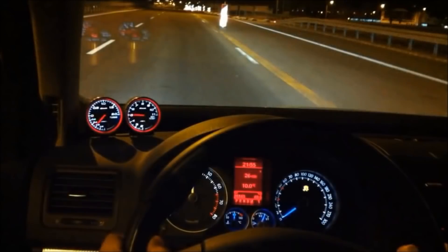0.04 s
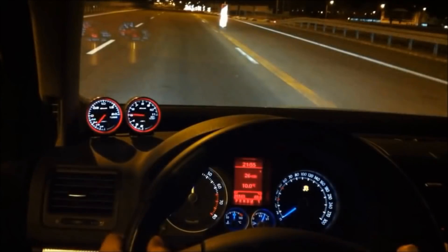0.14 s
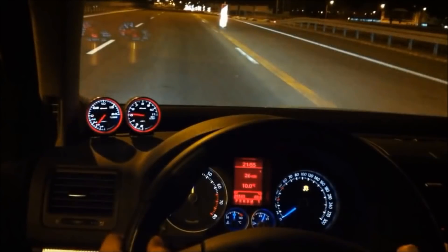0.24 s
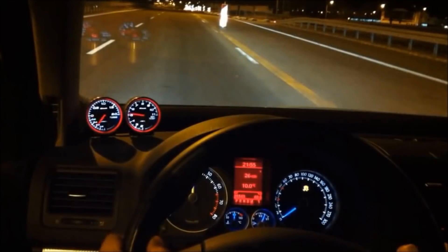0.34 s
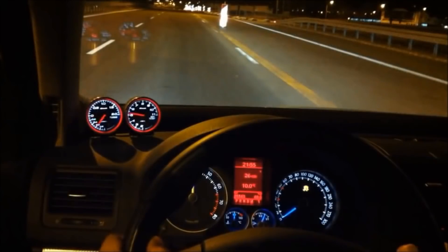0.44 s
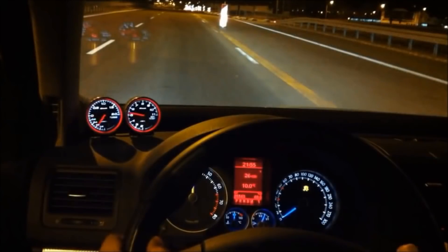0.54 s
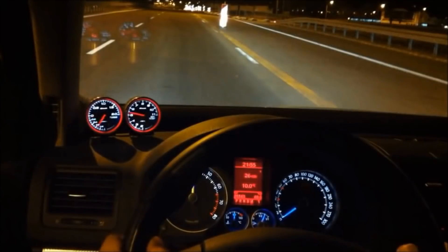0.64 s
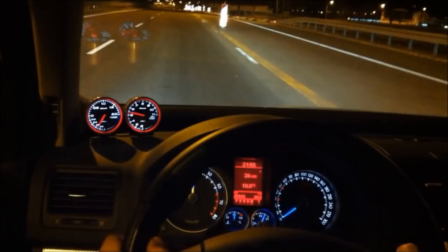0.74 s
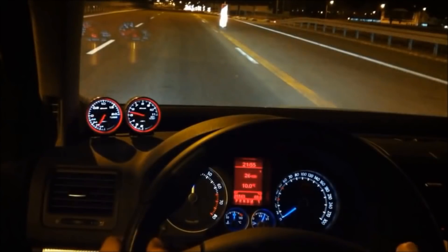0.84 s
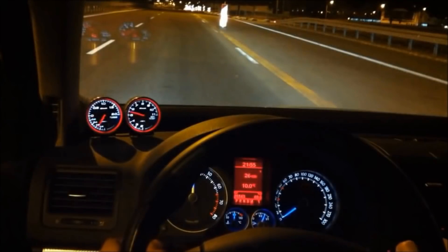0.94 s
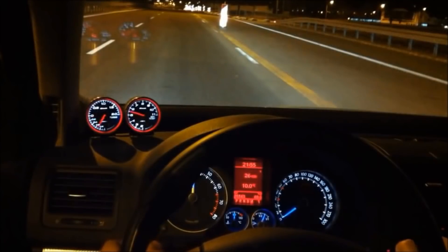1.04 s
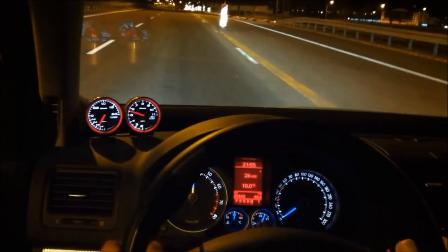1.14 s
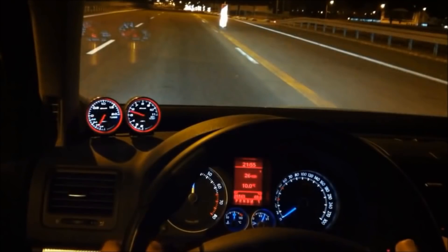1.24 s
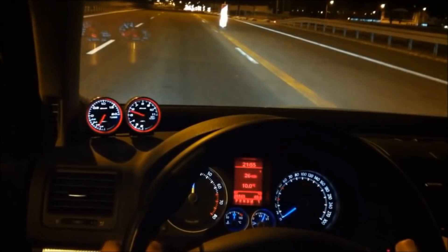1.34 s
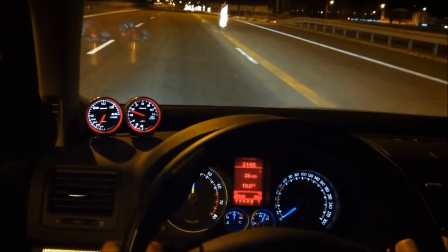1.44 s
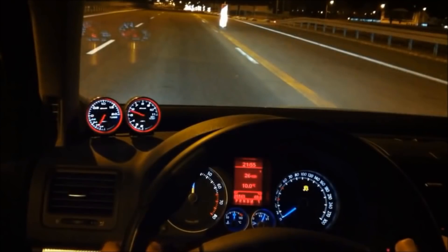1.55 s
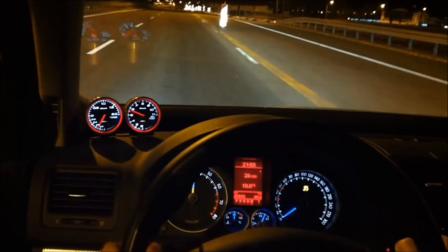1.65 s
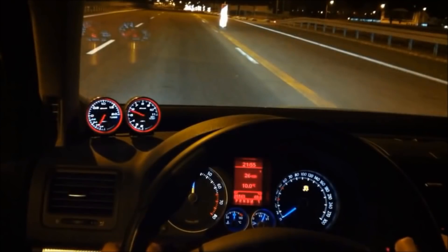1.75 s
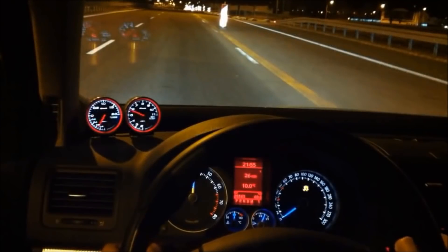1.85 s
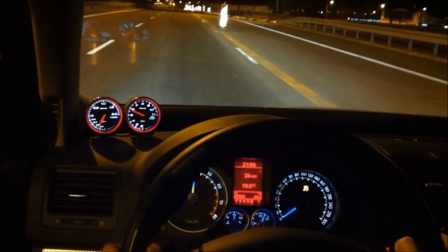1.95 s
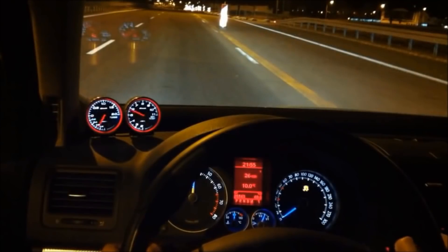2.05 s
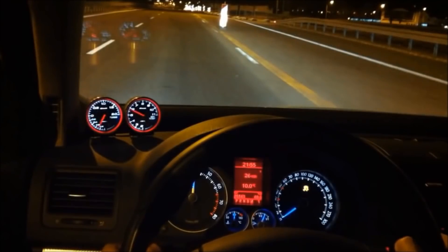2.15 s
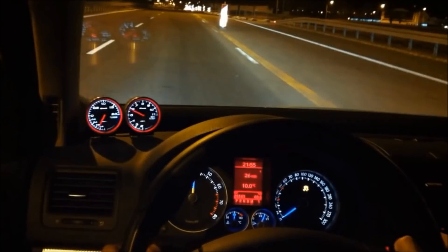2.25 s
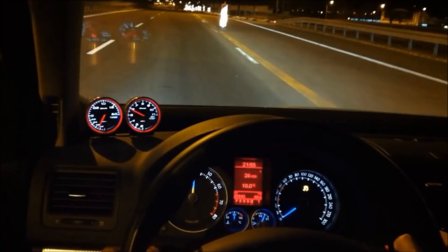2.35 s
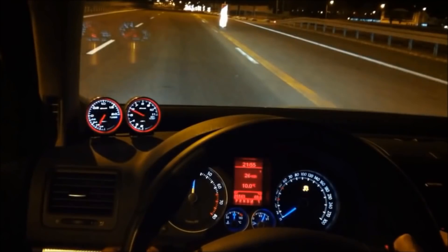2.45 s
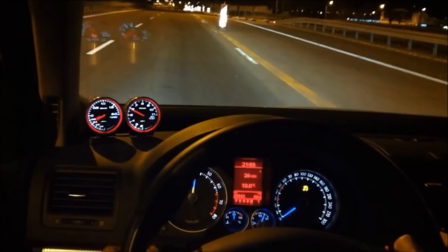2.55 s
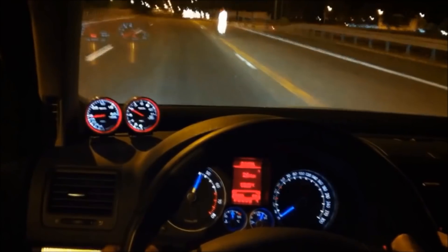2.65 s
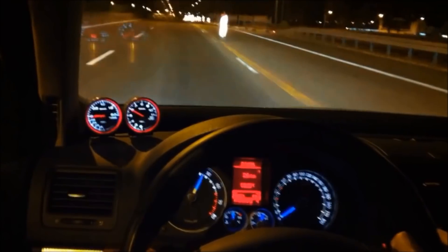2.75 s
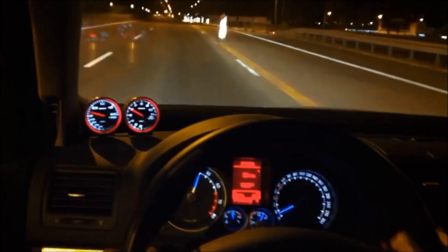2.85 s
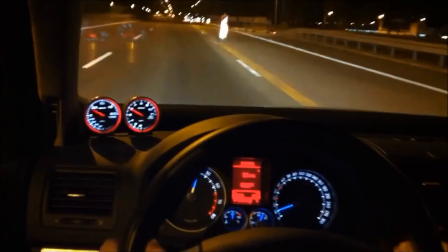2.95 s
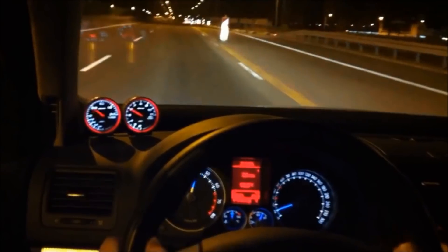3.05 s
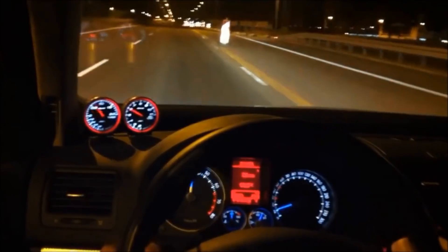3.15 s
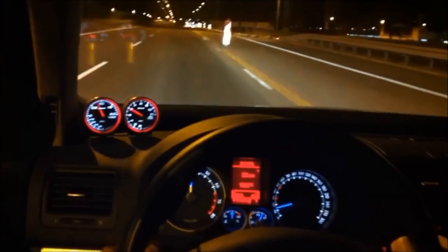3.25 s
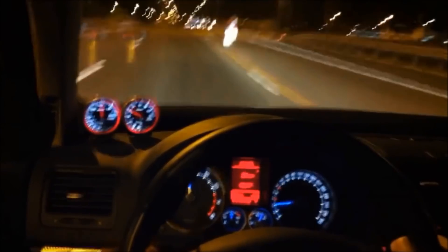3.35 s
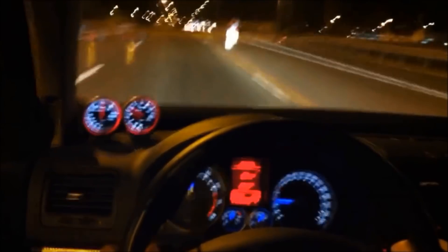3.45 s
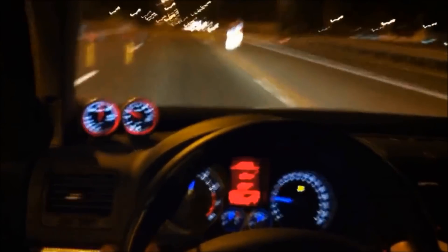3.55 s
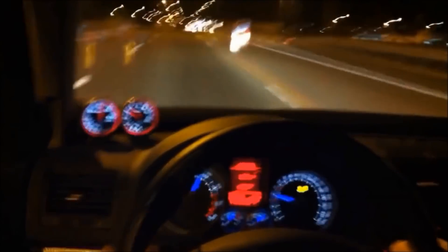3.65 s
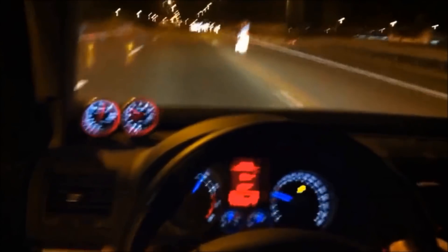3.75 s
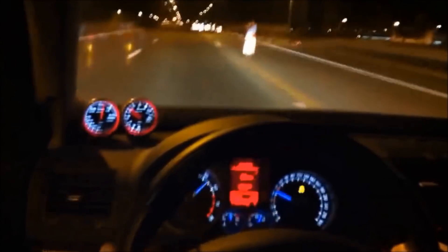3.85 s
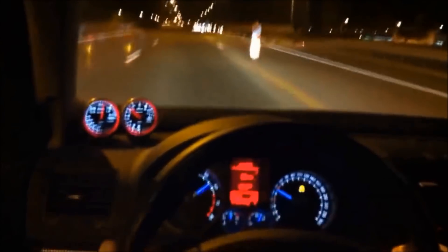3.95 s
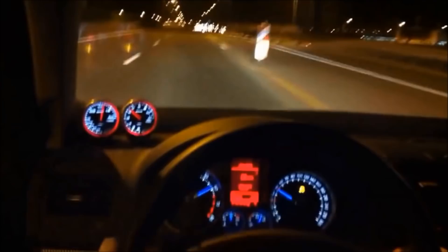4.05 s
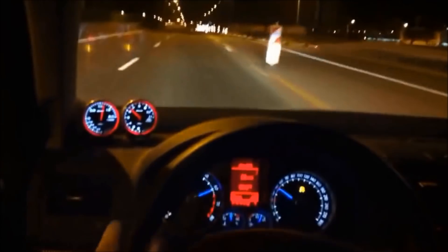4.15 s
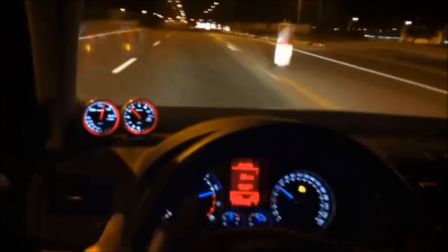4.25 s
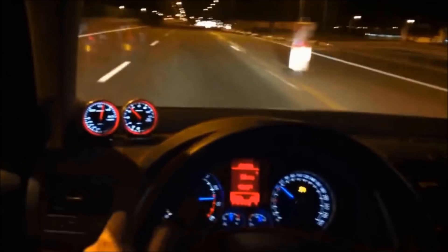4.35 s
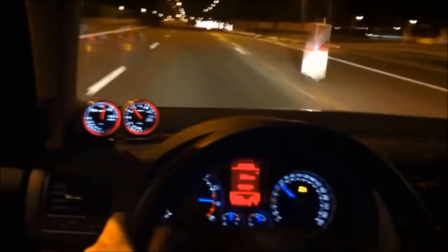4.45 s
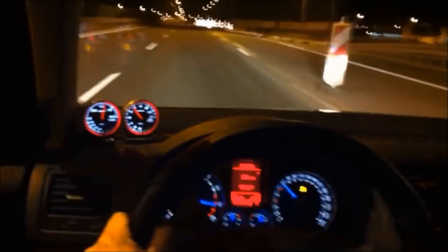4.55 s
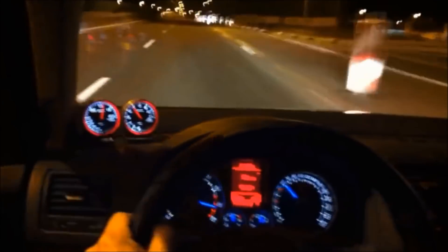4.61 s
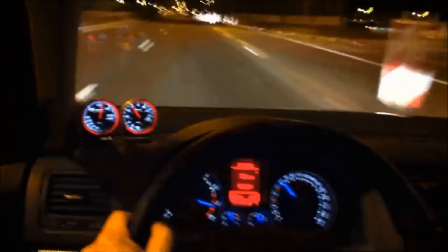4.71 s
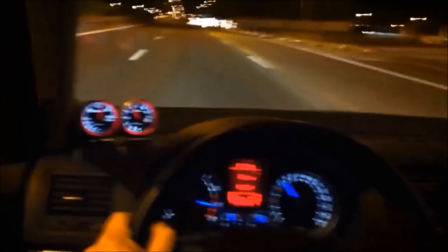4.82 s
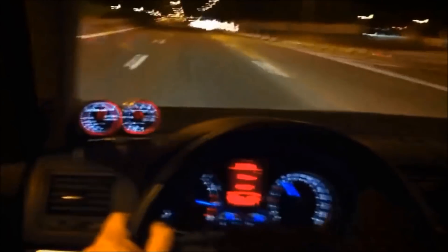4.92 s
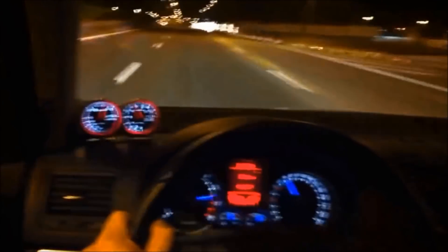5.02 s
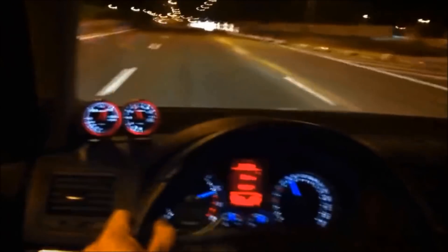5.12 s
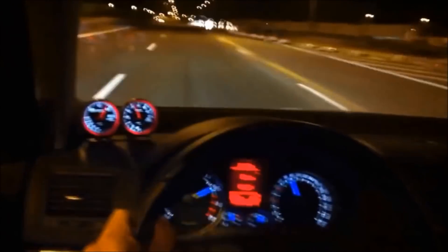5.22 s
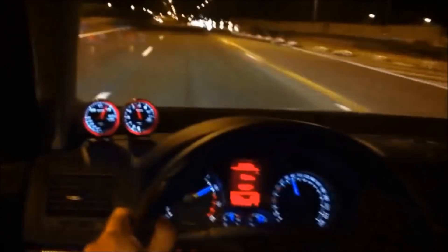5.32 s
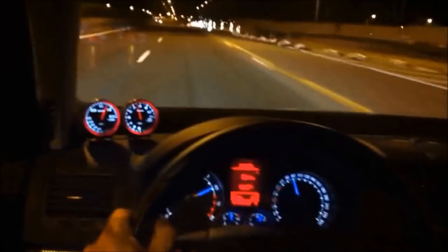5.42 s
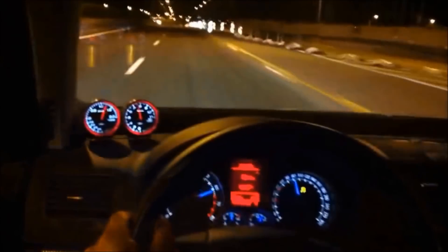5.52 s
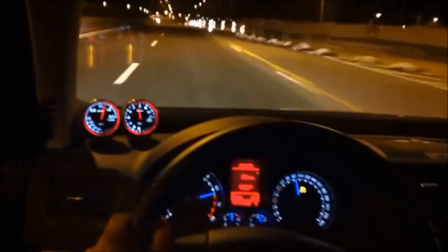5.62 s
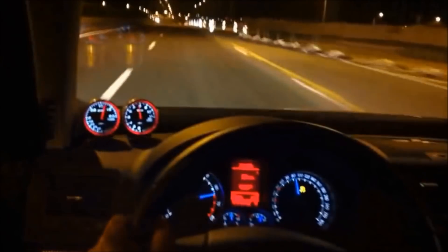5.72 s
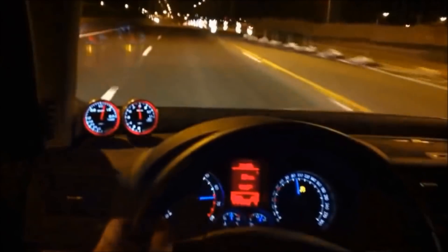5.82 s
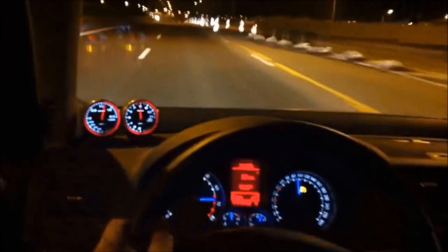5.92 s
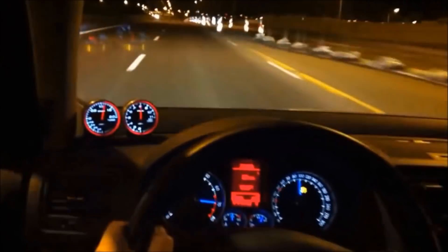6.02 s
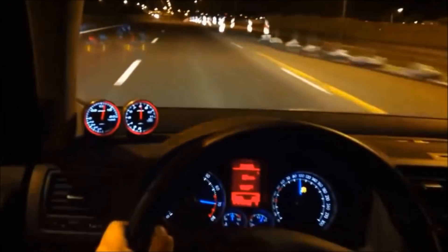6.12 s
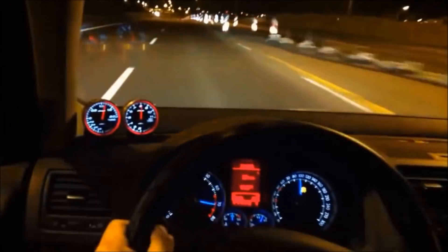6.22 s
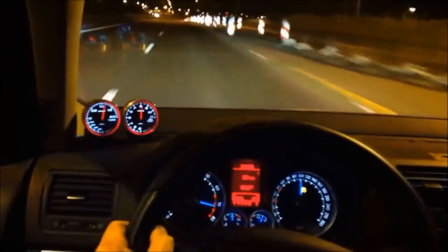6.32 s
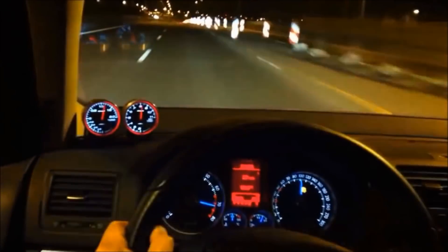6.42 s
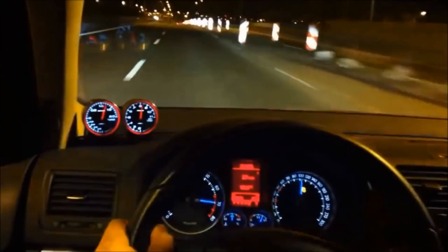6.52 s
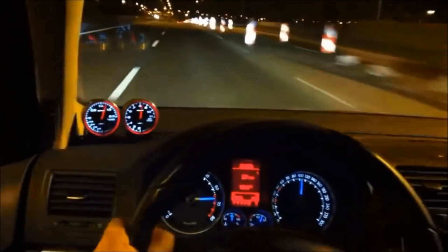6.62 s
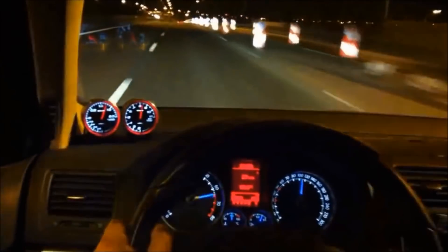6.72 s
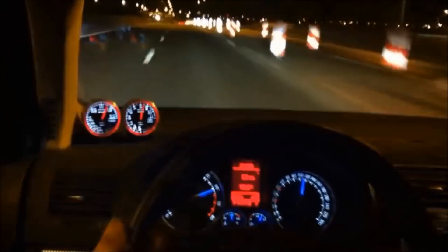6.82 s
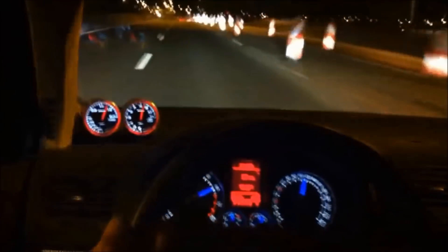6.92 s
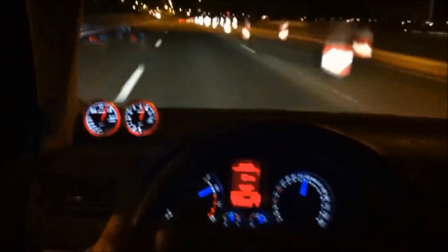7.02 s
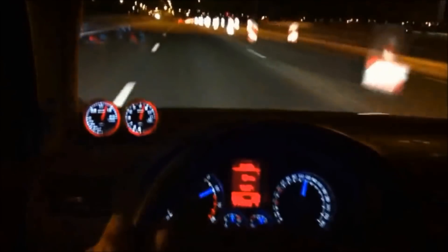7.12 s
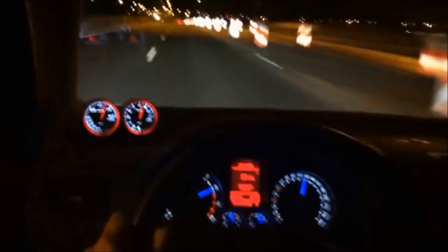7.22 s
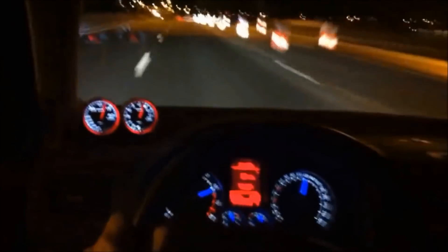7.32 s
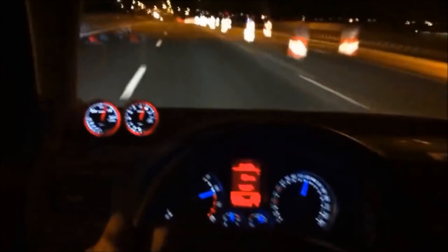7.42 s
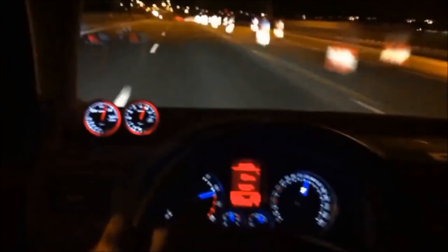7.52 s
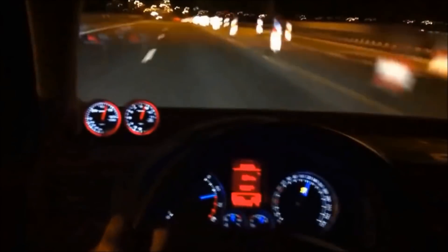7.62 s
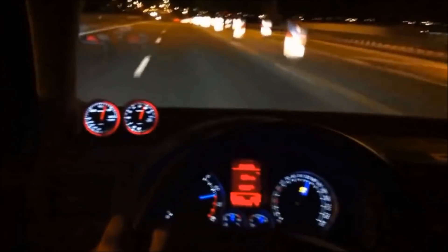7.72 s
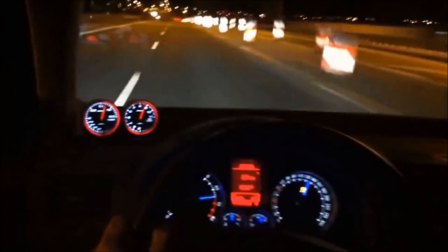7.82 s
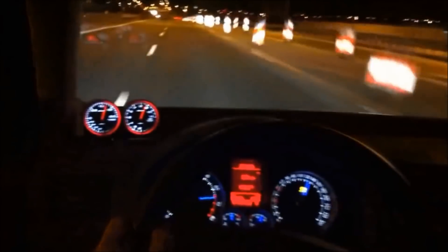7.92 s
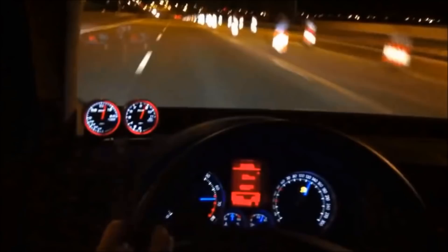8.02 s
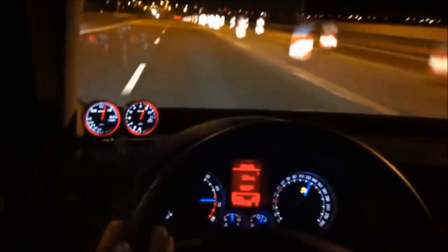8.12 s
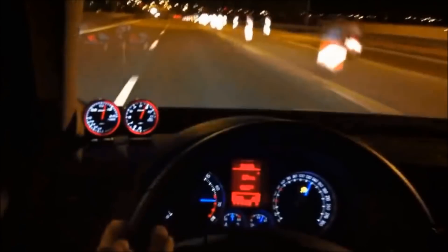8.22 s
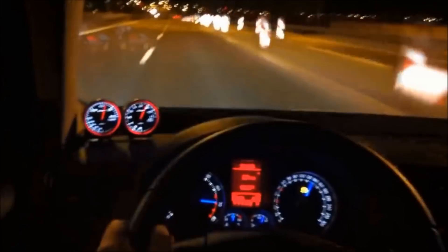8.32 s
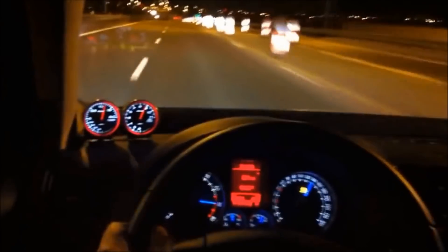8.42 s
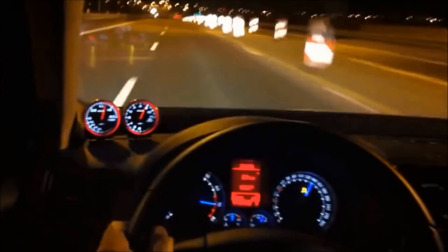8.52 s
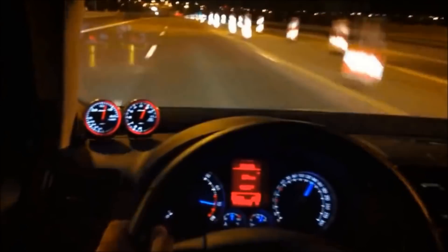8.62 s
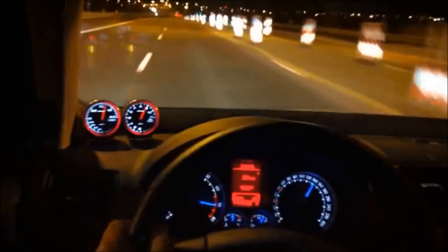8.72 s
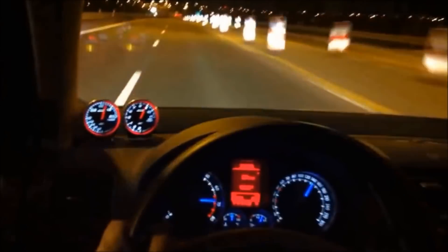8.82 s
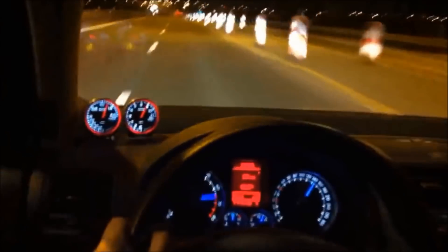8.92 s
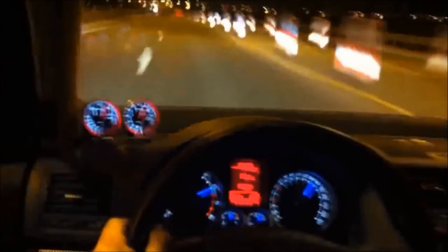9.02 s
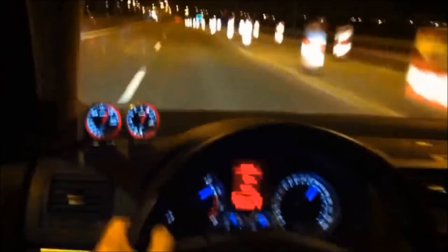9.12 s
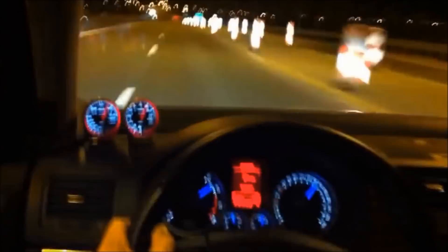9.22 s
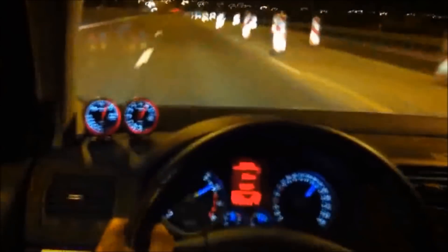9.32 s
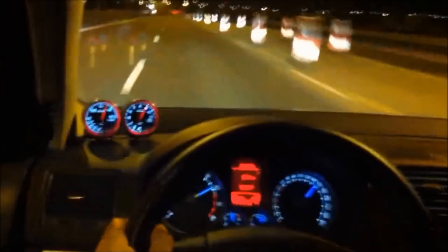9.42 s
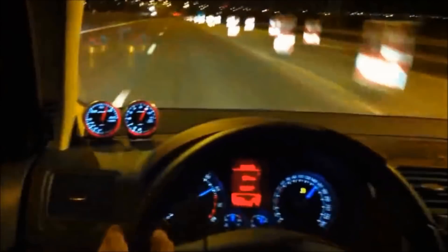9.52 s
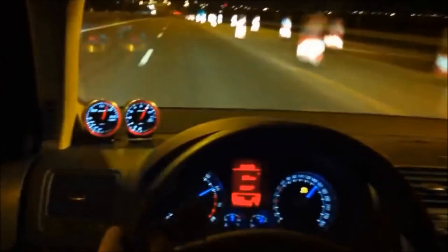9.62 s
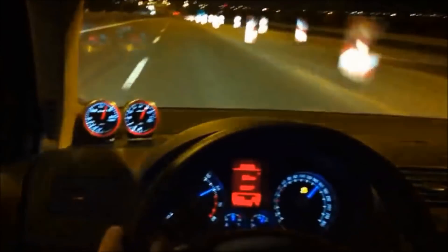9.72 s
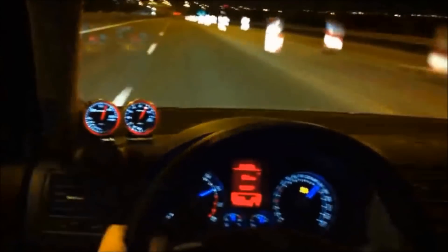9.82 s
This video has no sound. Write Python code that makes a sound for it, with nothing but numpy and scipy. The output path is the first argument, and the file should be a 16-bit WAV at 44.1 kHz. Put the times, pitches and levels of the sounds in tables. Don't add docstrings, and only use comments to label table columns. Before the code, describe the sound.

Inside a closed car cabin, recorded by a small, thin-bassed microphone near the dash. From 0 to 2.7 s a six-cylinder engine holds a steady, buzzing boom around 200 Hz, barely rising, with valve-train ticking ringing the bulkhead; dull knocks and cloth movement near 2.3-2.6 s. At 2.7 s the clutch bites: the note flares, then sags until 3.5 s, with floor thumps, plastic rattling, rustling and pops around 3.5-3.7 s as the wheels hop. The engine then pulls, much louder and rougher, climbing to about 4.7 s. A jolting upshift at 4.6-5 s stutters with hard pops and a metallic clank; pitch falls by 5.3 s. It climbs again to 6.6 s, drops by 7 s, climbs to 8.9 s, then drops around 9.2 s with a thump and short air puff. Road roar grows, trim ticks, faint turbo whistle; peaks flatten, and it ends still pulling.

```python
import sys
import numpy as np
from scipy import signal
from scipy.fft import rfft, irfft, next_fast_len
from scipy.io import wavfile
from scipy.ndimage import uniform_filter1d, minimum_filter1d

SR = 44100
rng = np.random.default_rng(int(sys.argv[2]) if len(sys.argv) > 2 else 0)


def makeup_ratio(level_db):
    decades = np.asarray(level_db, float) / 20
    return 10 ** decades


def generate_wav(signal):
    frames = np.transpose(np.atleast_2d(signal))
    scaled = np.clip(frames, -1, 1) * 32767
    pcm = np.round(scaled).astype(np.int16)
    wavfile.write(sys.argv[1], SR, pcm)


N = 434826
LAUNCH_S = 2.7
REFERENCE_HZ = 50

# start_s, cycle_hz
ENGINE = [(0.0, 32.3), (1.0, 33.2), (2.68, 33.57), (2.81, 40.12), (3.05, 36.39), (3.5, 31.13), (4.12, 48),
          (4.34, 50.8), (4.7, 60.18), (5.08, 58.8), (5.29, 48.15), (5.46, 47.85), (6.3, 59.05),
          (6.57, 59.97), (7.03, 48.0), (8.86, 59.53), (9.21, 46.99), (9.86, 48.54)]
# centre_s, change_hz, half_length_s
SPEED_SWINGS = [(2.74, 1.53, .03), (3.74, 0.87, 0.069), (4.45, 0.83, .07), (4.68, -1.08, 0.068),
                (5.8, 0.57, .15), (6.35, -0.79, .06), (6.56, -0.84, .06), (7.3, -.35, .15), (8.82, -0.74, .07),
                (9.32, -0.63, 0.073), (9.55, 0.48, 0.068)]
FLYWHEEL_S = .08


def speed():
    return uniform_filter1d(in_time(ENGINE)[0], int(FLYWHEEL_S * SR) + 1) + swells(SPEED_SWINGS)


BITE_S, BITE_HALF_S, BITE_DB = 2.71, 0.23, 5.5


def bite_db():
    return BITE_DB * np.exp(-((np.arange(N) / SR - BITE_S) / BITE_HALF_S) ** 2)


# multiple_of_cycle_rate, level_db
HELD_ORDERS = [(2, -55.5), (3, -49), (4, -36.5), (5, -49.5), (6, -27), (7, -35.5), (8, -41.5), (9, -38.5),
               (10, -44.5), (11, -31.5), (12, -44), (13, -50.5), (14, -43), (15, -50), (16, -51),
               (17, -62.5), (18, -53.5), (19, -50.5), (20, -55.5), (21, -63), (22, -57.5), (23, -59.5),
               (24, -52.5), (25, -67), (26, -60.5), (27, -69), (28, -76), (29, -66), (30, -74.5),
               (31, -60.5)]
# multiple_of_cycle_rate, level_db
PULL_ORDERS = [(2, -31.5), (9, -46), (10, -35.5), (11, -35), (13, -33.5), (14, -39.5), (15, -39), (16, -43),
               (17, -44), (19, -39)]
# pitch_hz, gain_db
CABIN = [(65, -17), (95, -11), (118, 3), (140, -1.5), (175, 6.5), (200, 1), (237, 11), (270, 13), (310, 10),
         (380, 3.5), (460, 5), (560, -4.5), (750, -7), (1070, -19.5)]
# cycle_hz, firing_order_db,
# order_above_db, order_below_db, twice_firing_db, thrice_firing_db, order_8_db, half_firing_db
STRONG_ORDERS = [(32.2, -10.5, -26, -32, -14, -33.5, -38.5, -33),
                 (33.2, -8, -19.5, -25.5, -17, -43, -38, -41.5),
                 (34.55, -20.5, -13.5, -33, -29.5, -44.5, -43.5, -32),
                 (35.56, -24.5, -19, -26, -26.5, -45, -27.5, -30.5),
                 (37.1, -8, -20.5, -28, -22.5, -47, -32, -34),
                 (38.5, -8, -21, -29, -32, -43.5, -26.5, -34.5),
                 (39.3, -5.5, -23, -33.5, -26, -47.5, -25.5, -44),
                 (40.7, -8, -18.5, -27, -21, -34.5, -23.5, -33),
                 (45.95, -12.5, -19.5, -18, -29, -39, -32, -24),
                 (48, -7.5, -17.5, -18.5, -28, -37, -41.5, -29.5),
                 (50.66, -8, -18, -21, -31.5, -47, -36.5, -33),
                 (51.16, -11, -22.5, -19.5, -39.5, -45.5, -39, -30),
                 (54.76, -8.5, -16, -28.5, -42, -45.5, -37.5, -25.5),
                 (57.3, -6.5, -24.5, -24.5, -37, -46, -36, -28.5),
                 (57.85, -6.5, -35, -22.5, -34.5, -50, -38, -19),
                 (61.14, -11.5, -19.5, -13, -36.5, -47.5, -30, -24.5)]
# cycle_hz, level_db
FOURTH_ORDER = [(32, -33.5), (44, -33.5), (48, -32), (51, -29.5), (54, -31), (57.5, -31), (59.3, -17.5)]
BLIP_SHARE = [(6, 1), (7, 0.27), (8, -.7), (10, -1.5), (11, -0.7), (12, 1.57), (14, .4), (15, .9),
              (16, -0.52), (17, 1.9), (18, -0.45), (24, 0.032)]
# centre_s, half_length_s, firing_order_loss_db
CUTS = [
    (3.66, .05, 5),
    (4.613, .006, 10),
    (4.775, .022, 12),
    (4.822, .008, 8),
    (4.915, .024, 10),
]
HELD_BACK = (4.96, 0.21, 3.3)
HELD_BACK_SHARE = 0.35
BLIP_DB, BLIP_FADE_S = 8.5, 0.84
PIPE_SPACING_HZ, PIPE_PEAK_HZ = 128.0, 569.0
LUG_DB, LUG_BELOW_HZ = -0.5, 41
GRIP_S, SLIP_EIGHTH_DB, SLIP_UPPER_DB, SLIP_NOTCH_DB, NOTCH_HZ = 3.26, 9.5, -2.5, -17.5, 36.75
LOW_GEAR_DB, LOW_GEAR_S = 3.5, 4.75
LOWER_LAG = 2.0


def exhaust(load):
    phase = 2 * np.pi * np.cumsum(speed() * (1 + 0.0014 * drift(15))) / SR
    t, cycle_hz, load, turn = (v[::8] for v in (np.arange(N) / SR, speed(), load, phase))
    rate_hz, *columns = np.transpose(STRONG_ORDERS)
    own = {k: np.interp(cycle_hz, rate_hz, c) for k, c in zip((6, 7, 5, 12, 18, 8, 3), columns)}
    blip_db = BLIP_DB * np.exp(-(t / BLIP_FADE_S) ** 2) + bite_db()[::8]
    cut = sum(np.exp(-((t - s) / half) ** 4) for s, half, _ in CUTS)
    cut_db = sum(db * np.exp(-((t - s) / half) ** 4) for s, half, db in CUTS + [HELD_BACK])
    slip = np.clip((GRIP_S - t) / .06, 0, 1)
    extra_db = {
        6: slip * SLIP_NOTCH_DB * np.exp(-((cycle_hz - NOTCH_HZ) / 1.2) ** 2) - cut_db,
        12: -LOW_GEAR_DB * np.exp(-((t - LOW_GEAR_S) / .8) ** 4),
        8: slip * SLIP_EIGHTH_DB,
        18: slip * SLIP_UPPER_DB}
    pull, share, out = dict(PULL_ORDERS), dict(BLIP_SHARE), 0
    for k, held_db in HELD_ORDERS:
        hz = k * cycle_hz
        pipe_db = 4 * (k > 7) * np.cos(2 * np.pi * (hz - PIPE_PEAK_HZ) / PIPE_SPACING_HZ)
        pattern_db = pull.get(k, -43 - 1.2 * (k - 18)) + at_hz(CABIN, np.minimum(hz, CABIN[-2][0]))
        if k == 4:
            pattern_db = np.interp(cycle_hz, *np.transpose(FOURTH_ORDER))
        pulling_db = pattern_db + pipe_db + (3 + (k == 4)) * drift(5, size=8)
        if k > 8:
            pulling_db += LUG_DB * np.clip((LUG_BELOW_HZ - cycle_hz) / 2, 0, 1) + SLIP_UPPER_DB * slip
        if k in own:
            pulling_db = own[k] + (.9 + 1.2 * (k > 7)) * drift(13, size=8) + extra_db.get(k, 0)
        pulling_db -= HELD_BACK_SHARE * cut_db * (k != 6)
        standing_db = held_db + blip_db * share.get(k, 0) + (0.3 + 0.05 * k) * drift(3.1, size=8)
        level_db = load * pulling_db + (1 - load) * standing_db
        start = rng.uniform(0, 2 * np.pi) * (k not in own) - LOWER_LAG * (k == 5)
        blur = (.019 * k + .25 * load * (k < 5)) * drift(12, size=8) + 1.5 * cut * drift(40, size=8)
        out = out + makeup_ratio(level_db) * np.sqrt(2) * np.sin(k * turn + start + blur)
    return signal.resample_poly(out, 8, 1)[:N], phase


# centre_s, half_length_s, lift_db
SHUDDERS = [
    (2.708, 0.053, 3.5),
    (3.624, 0.16, 6.5),
    (4.759, 0.026, 3),
    (4.935, 0.012, 6),
]
# standing_db, pulling_db, engine_speed_db_per_octave, road_speed_db_per_s, share_waiting_for_boost
RUMBLE, ROAR, HISS = (-44, -31, 0, 0.62, -0.05), (-52, -31, 8.5, 0.56, 0.1), (-58.5, -47.5, 12, 0.89, 0.3)
BOOST_S = 0.68


def noise_db(layer, load):
    standing_db, pulling_db, octave_db, road_db, waits = layer
    since = np.maximum(np.arange(N) / SR - LAUNCH_S, 0)
    boosted = load * (1 - waits * np.clip(1 - since / BOOST_S, 0, 1))
    level_db = standing_db + (1 - load) * bite_db() + boosted * (pulling_db - standing_db)
    level_db += load * (octave_db * np.log2(speed() / REFERENCE_HZ) + road_db * since)
    return level_db + swells([(s, db, half) for s, half, db in SHUDDERS])


# pitch_hz, density_db
HELD_COLOUR = [(12, -87), (20, -40), (81, -28), (116, -4.5), (149, -2.5), (202, 0), (267, -3.5), (372, 1),
               (566, -17), (700, -19), (934, -38.5), (1040, -37), (1170, -36), (2090, -50.5),
               (15600, -70.5)]
# pitch_hz, density_db
PULL_COLOUR = [(12, -90.5), (20, -56.5), (42, -56.5), (90, -27.5), (129, -14.5), (259, -13.5), (324, -10),
               (372, -9), (428, -15.5), (566, -16.5), (747, -28.5), (835, -23.5), (1980, -49.5),
               (5550, -58.5), (15600, -82)]


def roar(load, phase):
    rumble_db, roar_db, hiss_db = (noise_db(layer, load) for layer in (RUMBLE, ROAR, HISS))
    layers = []
    for low_hz, high_hz in ((70, 150), (600, 1500), (1800, 4200)):
        moving = load * coloured(PULL_COLOUR, low_hz, high_hz)
        layers.append(moving + (1 - load) * coloured(HELD_COLOUR, low_hz, high_hz))
    puffs = 1 + 0.065 * np.cos(6 * phase) + 0.092 * np.cos(3 * phase) + 0.03 * np.cos(phase)
    below_270 = signal.butter(2, 270, "low", fs=SR, output="sos")
    low = makeup_ratio(rumble_db - 3 + 0.5 * drift(20)) * signal.sosfilt(below_270, layers[0])
    middle = makeup_ratio(roar_db - 7.0 + 1.8 * drift(21)) * band(layers[1], 260, 1600) * puffs
    high = makeup_ratio(hiss_db - 3.5 + 1.1 * drift(25)) * band(layers[2], 1400, 6800) * puffs
    return low + middle + high


def panels(table, drive, patchy_db):
    out = 0
    for hz, width_hz, db in table:
        level = np.repeat(makeup_ratio(db + patchy_db * drift(3.4, size=64)), 64)[:N]
        out = out + level * rms_one(ring(ring(drive, hz, 2 * width_hz), hz, 2 * width_hz))
    return out


# pitch_hz, width_hz, level_db (re hiss)
HELD_PANELS = [(800, 14, -5), (1030, 30, 3), (1340, 40, -6), (1500, 50, -5), (2080, 80, -5), (2680, 50, -9),
               (3050, 200, -6)]
# pitch_hz, width_hz, level_db (re roar)
PULL_PANELS = [(570, 35, -8), (697, 35, -11), (825, 60, -11), (954, 50, -12), (1080, 60, -15),
               (1650, 150, -22), (2100, 70, -30), (2650, 60, -29), (3080, 60, -32), (3650, 80, -32),
               (4300, 80, -33)]


def valve_train(load, phase):
    roar_db, hiss_db = noise_db(ROAR, load), noise_db(HISS, load)
    firing = (6 * phase / (2 * np.pi)).astype(int)
    at = np.flatnonzero(np.diff(firing))
    turbulence, ticks = rng.standard_normal(N), np.zeros(N)
    cylinder = np.array([1, .1, .8, .5, -.3, .7])[firing[at] % 6]
    ticks[at] = cylinder * makeup_ratio(2 * rng.standard_normal(N)[at])
    standing = makeup_ratio(hiss_db - 8) * panels(HELD_PANELS, (1 - load) * (ticks + .075 * turbulence), 1.2)
    return standing + load * makeup_ratio(roar_db - 1) * panels(PULL_PANELS, ticks + .07 * turbulence, 2.2)


# start_s, peak_db, treble_db (re peak), pitch_hz
KNOCKS = [(2.389, -27.5, -37, 420), (2.552, -24.5, -37, 400), (3.136, -38, -26, 2000),
          (2.257, -45.5, -8.5, 2415), (2.361, -39.5, -16.5, 2006), (2.384, -40, -18.5, 1300),
          (2.545, -18.5, -34.5, 790), (2.585, -41, -17.5, 2495), (3.641, -36.5, -16, 2410),
          (4.718, -44.5, -7.5, 2996), (4.768, -17.5, -42, 943), (4.906, -23, -40.5, 840),
          (4.921, -17.5, -37, 1030), (4.934, -21.5, -37, 1130), (5.164, -49.5, -5, 3025)]
# start_s, peak_db, pitch_hz
THUMPS = [(2.65, -14, 113.6), (3.118, -7.5, 98), (3.5, -4.5, 129), (3.601, -10, 104.4), (3.759, -24, 44.8),
          (4.615, -9, 110), (4.75, -6.5, 126.7), (4.899, -12, 125), (5.33, -37, 45.1), (6.981, -29, 43),
          (9.12, -13, 110)]
# start_s, peak_db
POPS = [(3.504, -14), (3.588, 0), (3.685, 6), (4.619, -12), (4.751, 0), (4.769, 3), (4.798, -3),
        (4.838, -13), (4.867, -10), (4.904, 9), (4.92, 10), (4.937, 0), (4.953, -10)]
# start_s, peak_db
CLANKS = [
    (4.77, -26),
    (4.923, -8.5),
    (4.935, -18),
]
CLANK_HZ = 1075


def body():
    s, level_db, top_db, _ = np.transpose(KNOCKS)
    fade = np.exp(-np.arange(SR // 20) / (.005 * SR))

    def burst(hits):
        return signal.oaconvolve(hits, fade)[:N] * rng.standard_normal(N)

    out = 0.53 * band(burst(clicks(s, level_db)), 600, 3700)
    out += 4.5 * band(burst(clicks(s, level_db + top_db)), 3000, 16000)
    out += sum(2.5 * band(ring(clicks([s], [db]), hz, 260), 450, 4000) for s, db, _, hz in KNOCKS)
    out += band(band(ring(clicks(*np.transpose(POPS)), 325, 170), 80, 700), 60, 900)
    clank = ring(ring(clicks(*np.transpose(CLANKS)), CLANK_HZ, 150), CLANK_HZ, 150)
    out += clank * 150 * np.pi * np.e / SR
    t = np.arange(SR // 4) / SR
    for s, level_db, hz in THUMPS:
        swell = (t / 0.035) * np.exp(1 - t / 0.017)
        out[int(s * SR):][:len(t)] += makeup_ratio(level_db) * swell * np.sin(2 * np.pi * hz * t)
    return out


# centre_s, level_db, half_length_s
RUSTLE = [(2.253, -53.5, .014), (2.371, -53.5, .035), (2.547, -54.5, 0.015), (2.777, -50.5, 0.014),
          (2.842, -50, 0.043), (2.935, -50, .03), (2.97, -45.5, .008), (3.122, -48, .012),
          (3.173, -50, 0.028), (3.229, -50.5, .007), (3.383, -51, .02), (3.437, -55, .03),
          (3.471, -49.5, 0.0041), (3.5, -50, .02), (3.524, -48, 0.0067), (3.567, -45.5, 0.013),
          (3.633, -42, .03), (3.699, -49.5, 0.053), (3.927, -49.5, 0.0066), (3.944, -46, .008),
          (4.707, -50, 0.011), (4.934, -56, 0.083), (5.17, -55.5, .01), (5.238, -48.5, .013)]
# start_s, peak_db
BUZZ = [(2.7387, -47), (2.78, -40), (2.7896, -30), (2.8425, -45), (2.853, -41), (2.918, -30.5),
        (2.964, -33), (3.092, -34), (3.1124, -36), (3.133, -28), (3.177, -29), (3.2286, -40), (3.5598, -31),
        (3.6033, -38), (3.619, -30), (3.6652, -33), (3.678, -25.5), (3.7075, -32), (3.784, -35.5),
        (3.9214, -35), (4.0128, -36), (4.5721, -32), (4.751, -37), (4.9103, -41), (4.9168, -36),
        (4.961, -32), (5.032, -42), (5.1639, -39), (5.2274, -28), (5.3532, -47), (6.261, -35),
        (6.5828, -34), (6.678, -36), (6.797, -36), (7.0739, -36), (7.2785, -34), (7.4021, -33),
        (7.539, -37), (7.922, -34), (7.9773, -28), (8.022, -41), (8.0398, -35), (8.112, -38.5),
        (8.2204, -33), (8.2663, -31), (8.2934, -31.5), (8.3466, -36), (8.3804, -32), (8.7876, -38),
        (8.8832, -37), (8.9267, -35), (8.953, -30), (8.9701, -33), (9.081, -41), (9.2819, -35),
        (9.6967, -38.5), (9.7244, -35), (9.8107, -35.5)]
# start_s, peak_db
TICKS = [(3.1438, -30), (3.1554, -35), (3.166, -31), (3.7274, -48), (3.7271, -35.5), (3.7994, -34),
         (3.8506, -47), (4.0563, -46.5), (4.8564, -40), (4.9744, -34), (4.9844, -37), (5.5967, -39),
         (5.6657, -41), (5.7164, -38), (5.8292, -42.5), (5.8991, -41), (6.0999, -33.5), (6.2606, -35),
         (6.6186, -41), (6.9789, -35.5), (7.049, -38), (7.0948, -36), (7.2095, -38), (7.3402, -39),
         (7.7967, -37), (7.8605, -35.5), (8.4494, -36), (8.5052, -37), (8.9396, -35), (9.0418, -37),
         (9.2344, -36), (9.3076, -36), (9.3698, -40), (9.418, -40), (9.4345, -42), (9.5588, -44),
         (9.8101, -34.5)]


def trim(load):
    s, level_db = np.transpose(BUZZ)
    chance = rng.standard_normal((len(s), 3, 4))
    bounce = np.arange(4)
    times = s[:, None] + bounce * (0.0082 + 0.0012 * chance[:, 0])
    levels_db = level_db[:, None] + 2.5 - (bounce > 0) * (2 + 3.8 * bounce + 3 * chance[:, 1])
    shaken = swells([(s, 70 * makeup_ratio(1.5 * (db + 50)), half) for s, db, half in RUSTLE])
    struck = rng.random(N) < (25 * makeup_ratio(6 * drift(6)) + shaken) / SR
    chatter = struck * rng.standard_normal(N) * load * makeup_ratio(-44) + clicks(*np.transpose(TICKS)) * makeup_ratio(5)
    low = clicks(times.ravel(), (levels_db + 3 * chance[:, 2]).ravel()) + chatter
    high = clicks(times.ravel(), (levels_db - 3 * chance[:, 2]).ravel()) + chatter
    return band(ring(low, 4900, 810) - 0.8 * ring(high, 5750, 600), 3200, 7500)


# start_s, end_s, level_db
WHISTLES = [
    (3.95, 4.75, -2.5),
    (5.75, 7.05, 1),
    (7.5, 9.15, -0.5),
    (9.4, 9.9, -11),
]
WHISTLE_S, SPOOL_HZ, SPOOL_S = 3.95, 500, .3
WHISTLE_HZ, WHISTLE_PER_CYCLE_HZ, WHISTLE_DB = 11250, 55, -66.5
WHISTLE_FAINT, WHISTLE_FADE_S = .4, .35


def turbo():
    t = np.arange(N) / SR
    on = 0
    for start, end, db in WHISTLES:
        on = on + makeup_ratio(db) * np.clip(np.minimum(t - start, end - t) / WHISTLE_FADE_S + .3, 0, 1)
    on = np.maximum(on, WHISTLE_FAINT * (t > WHISTLE_S))
    hz = WHISTLE_HZ + WHISTLE_PER_CYCLE_HZ * (speed() - REFERENCE_HZ)
    hz = hz - SPOOL_HZ * np.exp(-np.abs(t - WHISTLE_S) / SPOOL_S)
    phase = 2 * np.pi * np.cumsum(hz + 110 * drift(120)) / SR
    return on * makeup_ratio(WHISTLE_DB + 2.5 * drift(10)) * np.sin(phase)


# centre_s, level_db, length_s
VALVE = [
    (7.404, -60, 0.24),
    (8.277, -59, 0.33),
    (9.281, -50, .1),
]
RUSTLE_BED = (3, -58, 0.69)
RUSTLE_TILT_DB = -4.6
AIR_STANDING_DB, AIR_MOVING_DB, AIR_DB_PER_S, AIR_BUILDS_S, MIC_HISS_DB = -68.5, -61.5, 0.5, 1.3, -82


def top_hiss(load):
    t = np.arange(N) / SR
    jolts = swells([(s, makeup_ratio(db), half) for s, db, half in RUSTLE + [RUSTLE_BED]])
    grain = rng.standard_normal(N) * makeup_ratio(2.5 * drift(300))
    squeak = rms_one(ring(grain, 13900, 120) + .6 * ring(grain, 15040, 120))
    squeak = squeak * np.exp(-((t - 3.49) / .025) ** 2)
    cloth = 0
    for hz in 2400 * 1.36 ** np.arange(6):
        level_db = RUSTLE_TILT_DB * np.log2(hz / 2400) + 1.3 * drift(70)
        cloth = cloth + makeup_ratio(level_db) * band(grain, .93 * hz, 1.45 * hz)
    rustle = jolts * (rms_one(cloth) + .9 * squeak)
    patches = makeup_ratio(drift(14)) * band(rng.standard_normal(N), 6400, 15500)
    moving_db = AIR_MOVING_DB - AIR_STANDING_DB + AIR_DB_PER_S * (t - LAUNCH_S)
    air_db = AIR_STANDING_DB + np.clip((t - LAUNCH_S) / AIR_BUILDS_S, 0, 1) * moving_db
    air = makeup_ratio(air_db) * rms_one(signal.sosfilt(signal.butter(1, 9000, fs=SR, output="sos"), patches))
    mic_hiss = makeup_ratio(MIC_HISS_DB) * rms_one(band(patches, 10500, 15500))
    puffs = sum(makeup_ratio(db) * np.exp(-(2 * (t - s) / length) ** 2) for s, db, length in VALVE)
    valve = puffs * rms_one(ring(grain, 9600.0, 1800) + .5 * ring(grain, 13500, 2500))
    return rustle + air + mic_hiss + valve


def in_time(rows):
    s, *columns = np.transpose(rows)
    return [np.interp(np.arange(N) / SR, s, c) for c in columns]


def at_hz(points, hz):
    point_hz, level_db = np.transpose(points)
    return np.interp(np.log(hz), np.log(point_hz), level_db)


def rms_one(x):
    return x / np.sqrt(np.mean(x ** 2) + 1e-20)


def drift(rate, size=1):
    r = np.exp(-128 * np.pi * rate / SR)
    slow = signal.lfilter([1], [1, -2 * r, r * r], rng.standard_normal(N // 64 + 1002))[1000:]
    return np.interp(np.arange(0, N, size) / 64, np.arange(len(slow)), rms_one(slow))


def swells(rows):
    t = np.arange(0, N + 32, 32) / SR
    total = sum(height * np.exp(-((t - s) / half) ** 2) for s, height, half in rows)
    return np.interp(np.arange(N) / SR, t, total)


def band(x, low_hz, high_hz):
    return signal.sosfilt(signal.butter(2, [low_hz, min(high_hz, .45 * SR)], "band", fs=SR, output="sos"), x)


def ring(x, hz, width_hz):
    r, w = np.exp(-np.pi * width_hz / SR), 2 * np.pi * hz / SR
    return signal.lfilter([0, np.sin(w)], [1, -2 * r * np.cos(w), r * r], x + 1e-18)


def clicks(times, levels_db):
    out = np.zeros(N)
    out[np.minimum((np.asarray(times) * SR).astype(int), N - 1)] = makeup_ratio(np.asarray(levels_db))
    return out


def coloured(spectrum, low_hz, high_hz):
    size = next_fast_len(N)
    hz = np.maximum(np.arange(size // 2 + 1) * SR / size, 1)
    lines = rfft(rng.standard_normal(size)) * makeup_ratio(at_hz(spectrum, hz))
    inside = irfft(lines * (hz > low_hz) * (hz < high_hz), size)
    return irfft(lines, size)[:N] / np.sqrt(np.mean(inside ** 2))


def scene():
    load = np.clip((np.arange(N) / SR - LAUNCH_S) / 0.05 + .5, 0, 1)
    tones, phase = exhaust(load)
    engine = tones + roar(load, phase) + valve_train(load, phase)
    return (engine + top_hiss(load) + turbo() + trim(load) + body())[None, :]


MASKED_FROM_HZ, MASKED_UNDER_DB, WEAK_DB = 5500, -42, 2.7


def smooth(cells, bins, frames):
    return uniform_filter1d(uniform_filter1d(cells, size=bins, axis=0), size=frames, axis=1)


def masked(x):
    hz, _, cells = signal.stft(x, SR, nperseg=2048)
    power = np.abs(cells) ** 2
    contrast = smooth(power, 5, 4) / np.exp(smooth(np.log(power + 1e-20), 45, 4))
    treble = uniform_filter1d(power[hz > MASKED_FROM_HZ].sum(axis=0), size=3)
    buried = treble < makeup_ratio(2 * MASKED_UNDER_DB) * power.sum(axis=0)
    limit = makeup_ratio(2 * WEAK_DB) * np.clip((hz - MASKED_FROM_HZ) / 9000, 0, 1) ** .5
    return signal.istft(cells * (contrast >= limit[:, None] * buried), SR, nperseg=2048)[1][:N]


def roll_off(x):
    return signal.sosfilt(signal.butter(12, 15710, fs=SR, output="sos"), x)


def record(dry):
    thin = masked(signal.sosfilt(signal.butter(2, 68, "high", fs=SR, output="sos"), dry)[0])
    width = int(.002 * SR) * 2 + 1
    gain = minimum_filter1d(np.minimum(1, 1.002 / (np.abs(thin) + 1e-9)), size=width)
    mix = (thin * uniform_filter1d(gain, size=width))[None, :]
    return roll_off(mix)


dry = scene()
out = record(dry)
generate_wav(out)
```